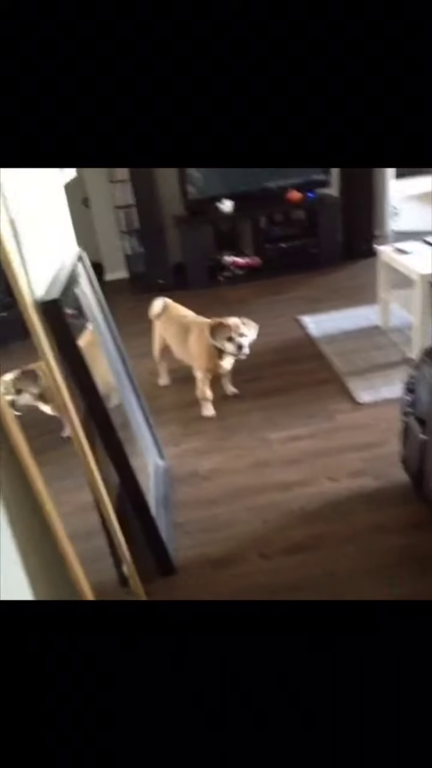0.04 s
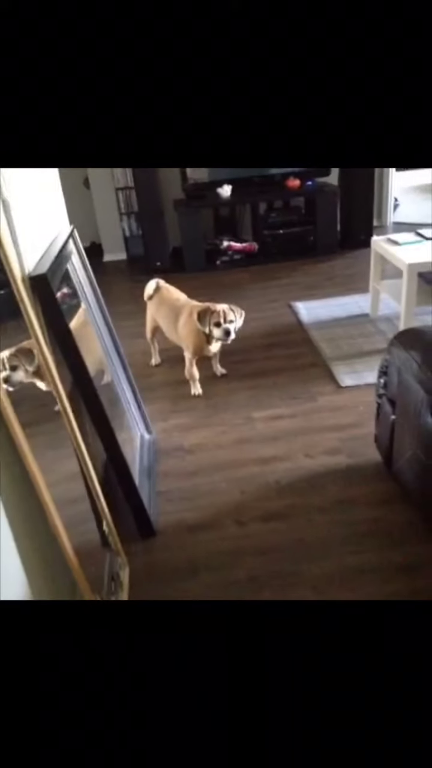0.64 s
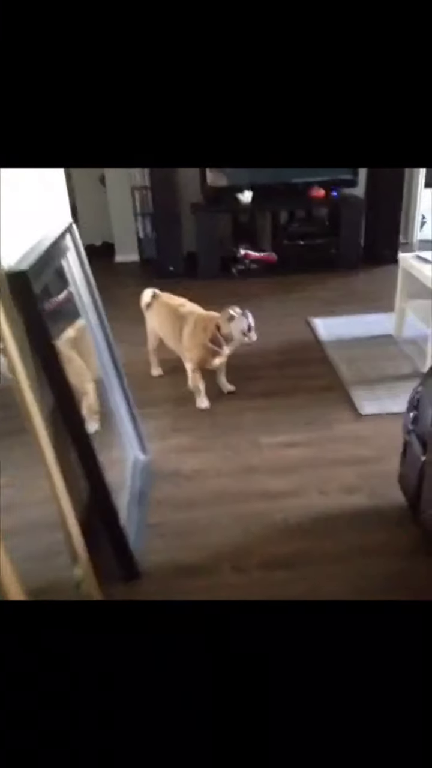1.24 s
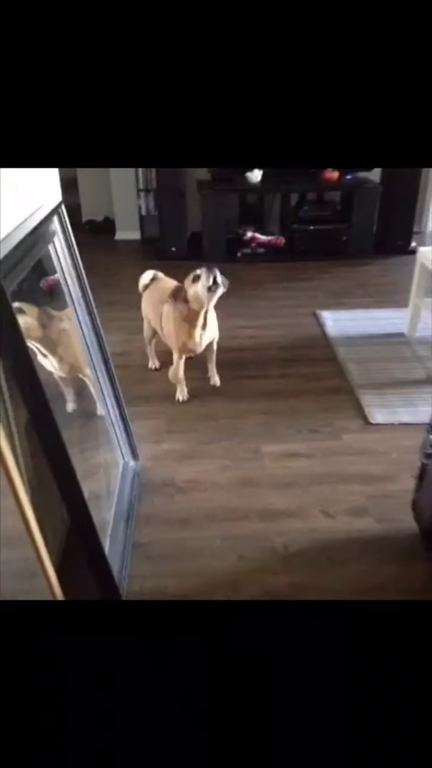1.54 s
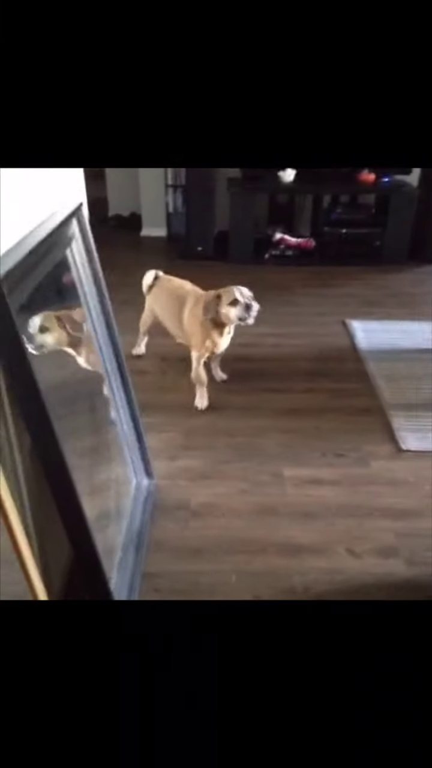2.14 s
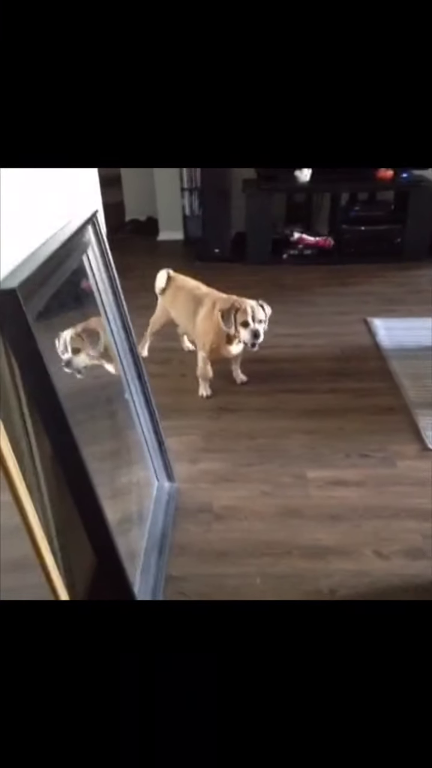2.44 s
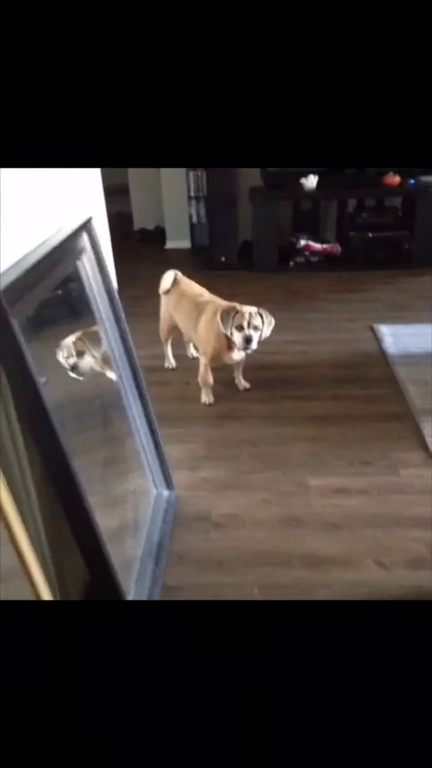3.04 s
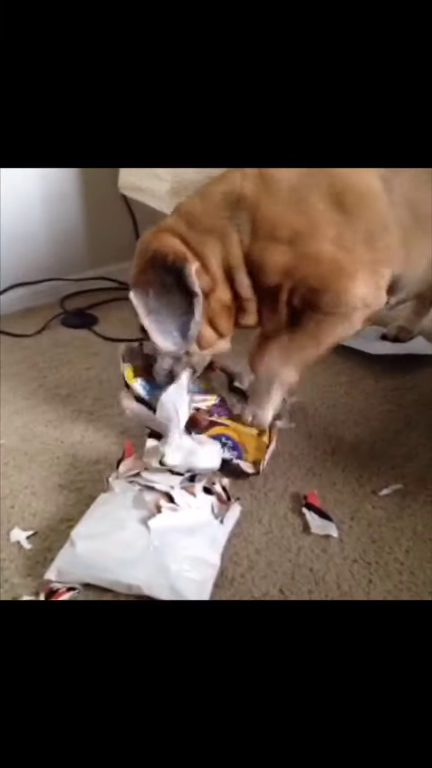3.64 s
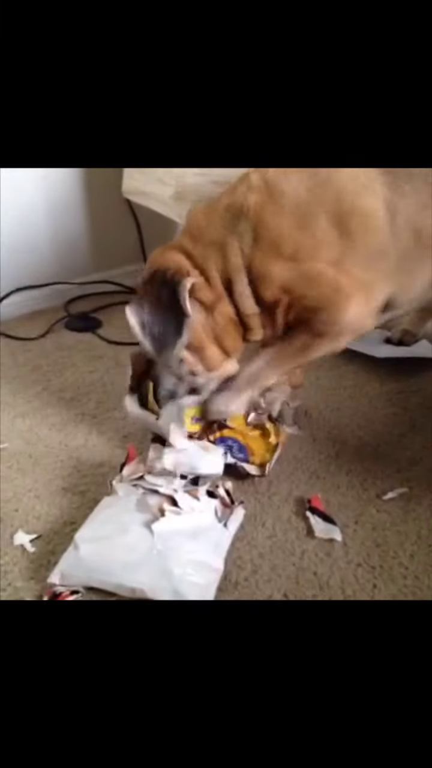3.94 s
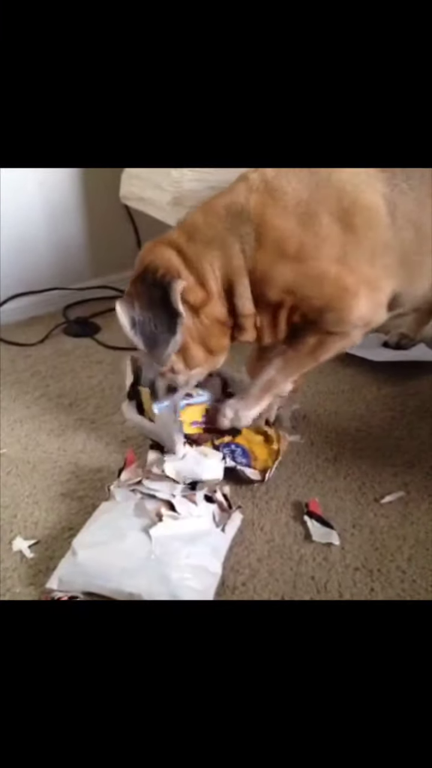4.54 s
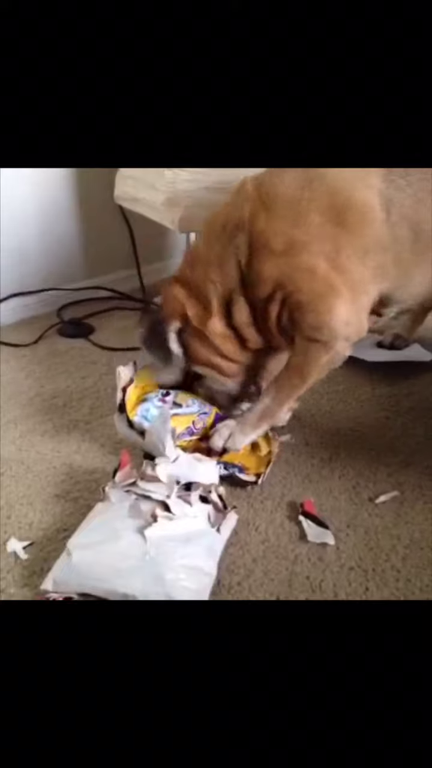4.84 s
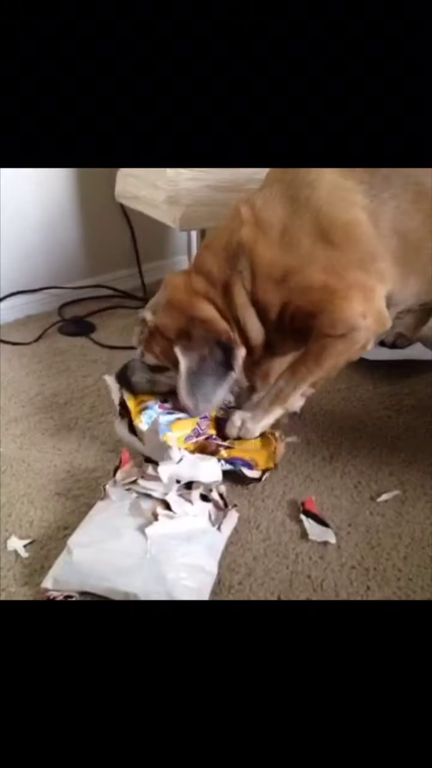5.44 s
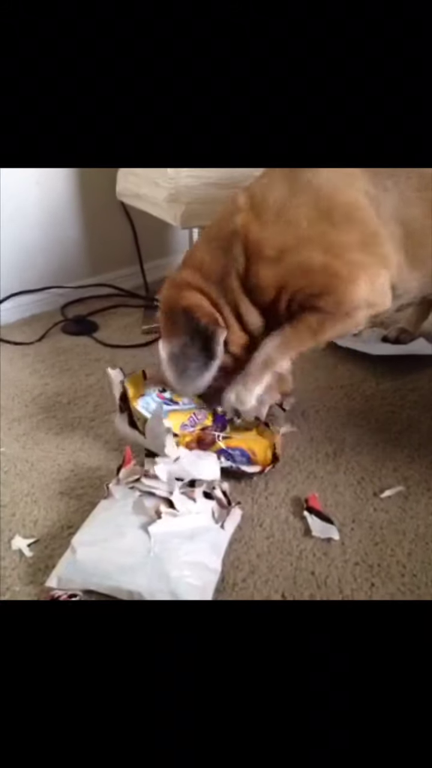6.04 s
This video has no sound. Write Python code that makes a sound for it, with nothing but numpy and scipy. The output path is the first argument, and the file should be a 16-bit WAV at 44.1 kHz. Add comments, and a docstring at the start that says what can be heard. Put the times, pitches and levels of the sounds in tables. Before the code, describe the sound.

Soft paw knocks and claw clicks sound on a hard floor over faint house noise. A small dog howls once, starting hoarse and sliding down in pitch, ringing in the bare room, then groans and draws a whistling breath. Halfway through, the place changes abruptly to a deadened room, with the microphone close to a dog working through paper wrapping: sharp snaps, short rips, hollow crunches and continuous crinkling.

```python
"""A small dog howls once in a bare, hard-floored living room. Two vocal fold vibrations make a rough
start, then one clean falling note overloads the microphone and sags into a groan and a wheezy gasp.
Paws knock and claws click on the boards, over faint house noise.
Then, close to the microphone in a carpeted room, a big dog tears and crumples a paper wrapping:
creases snap, panels buckle, fibres part and the whole sheet flexes."""
import sys
import numpy as np
from scipy import signal
from scipy.fft import rfft, irfft, next_fast_len
from scipy.io import wavfile
from scipy.ndimage import map_coordinates

SR = 44100
rng = np.random.default_rng(int(sys.argv[2]) if len(sys.argv) > 2 else 0)


def waveform_to_disk(signal):
    """Save audio, clipped to [-1, 1], as 16-bit WAV at the path in sys.argv[1]."""
    frames = np.transpose(np.atleast_2d(signal))
    scaled = np.clip(frames, -1, 1) * 32767
    samples = np.round(scaled).astype(np.int16)
    wavfile.write(sys.argv[1], SR, samples)


N = 277558
TIME = np.arange(N) / SR

# The level of the howl's fundamental, rising and dipping quickly. Each row: time in seconds, relative level of
# the fundamental in dB.
FUNDAMENTAL_LEVEL = [(1.15, -14), (1.214, -9), (1.26, -17), (1.294, -10), (1.32, -23.5), (1.352, -12),
                     (1.378, -28), (1.408, -8), (1.532, -16), (1.562, -9.5), (1.596, -12), (1.628, -16),
                     (1.71, -5), (1.77, -5.5), (1.834, -23.5), (1.922, -9.5), (1.942, -14.5), (1.972, -11.5),
                     (2.038, -24.5), (2.05, -25)]
# Unsteadiness of the folds. Each row: time in seconds, roughness from 0 to 1.
ROUGHNESS = [(1.14, .7), (1.2, .4), (1.36, .38), (1.45, .16), (1.52, .1), (1.78, .1), (1.94, .3),
             (2.07, .6)]
# Overtones from the third up. Each row: frequency in Hz, level against the fundamental in dB.
OVERTONES = [(1400, -22.5), (1700, -31.5), (2200, -42.5), (3500, -53.5), (4500, -60)]
# The voice's buzzy edge, mouth open, then lips rounded. Each row: frequency in Hz, relative gain in dB.
EDGE_OPEN = [(2500, -20.5), (3400, -16), (4100, -4), (5000, 6.5), (5800, -5.5), (6700, 2.5), (7600, -7.5),
             (9500, -14), (13000, -9.5), (16000, -23.5)]
EDGE_ROUNDED = [(2200, -1), (3200, -3.5), (4400, 0), (5500, -6.5), (7300, -2.5), (8100, -1.5), (9000, -2),
                (10800, -12.5), (13500, -12), (16000, -18.5)]
# Hoarse grating of the folds as the call starts. Each row: time in seconds, level in dB.
GRATE_LEVEL = [(1.132, -44), (1.15, -17.5), (1.185, -10), (1.23, -32.5), (1.35, -34), (1.5, -48)]
# Colour of that grating. Each row: frequency in Hz, relative gain in dB.
GRATE_SPECTRUM = [(110, -25.5), (220, -2.5), (420, -6.5), (800, 9), (1250, -20.5), (2050, -6), (2700, -31),
                  (4000, -28), (6000, -41)]
# The groan as the mouth closes. Each row: time in seconds, pitch in Hz, level in dB.
GROAN = [(2.03, 425, -30), (2.06, 368, -21), (2.095, 279, -40.5), (2.14, 216, -45.5)]
# The in-breath. Each row: time in seconds, whistle pitch in Hz, relative whistle and rush levels in dB.
IN_BREATH = [(2.16, 562, -66, -42.5), (2.25, 608, -29.5, -54), (2.3, 652.5, -37.5, -39),
             (2.38, 796, -38.5, -48), (2.46, 842, -44, -67), (2.51, 823, -72.5, -44),
             (2.55, 845, -58, -62.5)]
# Colour of the rushing breath. Each row: frequency in Hz, relative gain in dB.
BREATH_SPECTRUM = [(650, -42.5), (1100, -7), (1680, -4), (2250, -9), (2670, -5), (3120, -7.5), (5160, -5.5),
                   (8080, -11), (16000, -33)]
# Boards under the paws. Each row: start in seconds, relative level in dB, resonance and width in Hz,
# time to die by 60 dB in seconds.
BOARD_KNOCKS = [(.13, -45, 850, 400, .1), (.215, -44, 650, 500, .1), (.258, -29.5, 860, 280, .1),
                (.295, -39, 380, 350, .12), (.695, -47, 450, 500, .06), (.712, -38, 240, 300, .16),
                (.885, -55, 2700, 100, .14), (2.25, -45, 200, 200, .25), (2.31, -40, 270, 200, .15),
                (2.39, -42, 130, 130, .2)]
# Claws on the floor. Each row: start in seconds, relative level in dB.
CLAW_TICKS = [(.865, -53), (1.0, -48.5), (1.07, -48), (2.6215, -28.5)]
# Colour of a tick. Each row: frequency in Hz, relative gain in dB.
CLAW_SPECTRUM = [(410, -38), (700, -21.5), (910, 0.5), (1090, -5), (1800, -4), (2000, -5), (2130, -5.5),
                 (7290, 0), (16000, -21.5)]
# Creases snapping. Each row: start in seconds, relative levels of crack, push and fizz in dB.
CREASE_SNAPS = [(3.242, -30.5, -60, -56), (3.309, -16.5, -50, -40.5), (3.422, -13.5, -26.5, -31.5),
                (3.458, -19, -32, -30.5), (3.467, -10.5, -26, -36.5), (3.528, -7.5, -26.5, -34),
                (3.576, -6.5, -21.5, -22.5), (3.768, -16.5, -41, -39.5), (3.82, -13.5, -29.5, -39),
                (3.851, -9.5, -29, -32), (3.902, -3, -23.5, -25), (3.948, -11, -30.5, -31),
                (3.962, -8, -32.5, -29), (4.118, -6.5, -20.5, -32), (4.137, -8.5, -31, -29.5),
                (4.387, -11, -27, -34.5), (4.425, -11, -50, -33.5), (4.492, -15, -28.5, -30.5),
                (4.527, -11.5, -33, -25.5), (4.548, -16, -46, -31), (4.733, -8, -33.5, -31.5),
                (4.788, -16.5, -45, -39), (4.829, -20.5, -36.5, -48), (4.99, -13.5, -38, -32),
                (5.01, -17, -36, -28.5), (5.047, -20, -43, -29.5), (5.192, -15.5, -46, -36.5),
                (5.258, -6, -19.5, -31.5), (5.274, -6.5, -22.5, -29.5), (5.346, -15, -33, -46.5),
                (5.402, -25, -41, -36), (5.458, -20.5, -43, -37), (5.502, -15, -31.5, -35.5),
                (5.541, -18, -36.5, -27.5), (5.577, -14, -42, -29), (5.686, -23, -40.5, -39.5),
                (5.702, -22.5, -39, -43), (5.758, -17, -42, -33.5), (5.818, -19, -42, -32),
                (5.838, -11.5, -40, -28), (5.914, -15, -34.5, -38), (5.983, -19, -37.5, -44),
                (6.115, -14, -41, -41.5), (6.247, -18, -43, -30.5)]
# Stiff panels giving way. Each row: start in seconds, relative level in dB, resonance in Hz.
PANEL_BUCKLES = [(3.77, -25, 853), (4.12, -14.5, 867), (4.136, -11, 848), (4.736, -18.5, 860),
                 (4.851, -21, 840), (5.011, -19, 523), (5.03, -23, 590), (5.113, -25.5, 835),
                 (5.146, -20, 850), (5.157, -14, 842), (5.596, -25, 980), (5.685, -29, 785),
                 (5.723, -20, 835), (5.934, -23, 848)]
# Tears in the sheet. Each row: start and length in seconds, relative level in dB.
TEARS = [(3.475, 0.095, -34), (3.581, 0.03, -24.5), (3.954, 0.022, -34), (4.115, 0.042, -27),
         (4.729, .044, -42.5), (5.148, 0.026, -34), (5.24, .074, -27.5), (5.834, .013, -31.5)]
# Muzzle and paws on the paper. Each row: start and length in seconds, crinkle level in dB,
# relative level of the flexing sheet in dB.
PAPER_STROKES = [(3.137, 0.025, -57, -1.5), (3.254, 0.12, -44, -1.5), (3.41, 0.2, -31.5, -1),
                 (3.686, 0.033, -35.5, 0.5), (3.82, 0.2, -37, -2), (4.091, 0.065, -34.5, 0.5),
                 (4.227, 0.034, -44, 5), (4.354, 0.11, -36, -1.5), (4.492, 0.31, -38.5, -4),
                 (4.977, 0.078, -38, -3.5), (5.136, 0.13, -31.5, -1.5), (5.332, .055, -41, -0.5),
                 (5.506, 0.14, -42.5, 0.5), (5.7, 0.052, -39.5, 1), (5.835, 0.017, -42.5, 1.5),
                 (5.906, 0.079, -41, 2.5), (6.097, .04, -40, -3.5), (6.185, .09, -41, -5)]
# Colours of crisp paper and of the hollow sheet. Each row: frequency in Hz, relative gain in dB.
PAPER_SPECTRUM = [(350, -24), (700, -6), (1100, -8.5), (1700, -3), (2600, -5), (3800, -6), (5100, -4.5),
                  (6200, -9.5), (7600, -7.5), (10500, -18.5), (14000, -17.5), (16000, -22.5)]
SHEET_SPECTRUM = [(40, -30), (90, -26), (150, -3), (220, 0.5), (380, -0.5), (550, 3), (850, 1.5), (1300, 2),
                  (2000, -26), (3000, -49)]
# Living room tone. Each row: time in seconds, rumble level in dB, hiss level in dB.
ROOM_TONE = [(0, -52, -57), (.55, -58, -62.5), (.95, -60.5, -65), (1.1, -53, -58), (2.7, -60.5, -56),
             (2.95, -55, -64.5), (3.12, -63.5, -69.5)]
# Colours of that rumble and hiss. Each row: frequency in Hz, relative gain in dB.
RUMBLE_SPECTRUM = [(29, -62), (50, -35), (108, -6), (243, -2.5), (272, -11.5), (405, 0), (676, -8),
                   (837, -3), (1100, -18), (1300, -4.5), (1500, -28.5), (1950, -29.5), (3300, -120)]
HISS_SPECTRUM = [(880, -32), (1500, 4.5), (2080, 1.5), (2640, -1.5), (3840, -1.5), (4160, -1.5),
                 (5830, -6.5), (7240, -5.5), (16000, -22.5)]
# Decay of the two rooms. Each row: frequency in Hz, time to die by 60 dB in seconds.
BARE_ROOM = [(150, 0.2), (600, 0.85), (2000, 0.79), (6000, .6), (14000, 0.077)]
CARPETED_ROOM = [(150, 0.34), (1000, 0.19), (5000, 0.27), (14000, 0.25)]


def howl():
    """Two fold vibrations beat at first; the lower one wins, glides down and sags to a groan."""
    pitch = howl_pitch()
    level_db, = curves(FUNDAMENTAL_LEVEL)
    rough, = curves(ROUGHNESS)
    voiced = during(1.144, 3, .0084) * during(0, 2.06, .043)
    flutter = amp(2.5 * wobble(45.05) * during(1.81, 3, .041))  # the breath runs short
    octave_db = mouth_octave_db(pitch, level_db)
    note, phase = voice(pitch, octave_db - level_db, rough, jitter=.07, shimmer_db=2.5)
    note = amp(level_db - 1.18) * note * flutter * voiced
    return note + buzzy_edge(phase, rough, voiced) + squeal(pitch, level_db, rough) + groan(rough) + grate()


def howl_pitch():
    """A wavering arch in Hz; after a low start the first strain leaps above it and relaxes."""
    start_hz, crest_hz, leap_s = 513, 553, 1.17
    arch = np.maximum(crest_hz - 495 * (TIME - 1.575) ** 2, crest_hz / 2)
    strain = 135 * np.exp(-((TIME - leap_s) / .15) ** 2)
    pitch = start_hz + (arch + strain - start_hz) * during(leap_s, 3, .015)
    return pitch * (1 + .007 * wobble(28))


def voice(pitch, octave_db, rough, jitter, shimmer_db):
    """Vocal fold harmonics and their phase; roughness shakes pitch and size from cycle to cycle."""
    hz = pitch * (1 + jitter * rough * wobble(220))
    phase = 2 * np.pi * np.cumsum(hz) / SR
    tone = np.sin(phase) + amp(octave_db) * np.sin(2 * phase)
    for k in range(3, 9):
        tone += amp(along(OVERTONES, k * pitch)) * np.sin(k * phase + rng.uniform(0, 2 * np.pi))
    return np.sqrt(2) * tone * amp(shimmer_db * rough * wobble(260)), phase


def mouth_octave_db(pitch, level_db):
    """The mouth rings near the octave, more once the lips round; the octave partly follows the fundamental's
    level."""
    mouth_hz, width_hz = 1100, 190
    rounded = during(1.545, 3, .042)
    off_tune_db = 10 * np.log10(1 + (2 * (2 * pitch - mouth_hz) / width_hz) ** 2)
    return -16 + 3.5 * rounded - off_tune_db + .45 * level_db + 2 * wobble(22)


def buzzy_edge(phase, rough, voiced):
    """Each closing of the folds gives a thin whistle and a puff of air, coloured by the rounding mouth."""
    whistle = unit(sum(np.sin(k * phase + rng.uniform(0, 2 * np.pi)) * amp(3 * wobble(10))
                       for k in range(10, 27)))
    puffs = unit(rng.standard_normal(N) * (1 + .5 * np.sin(phase)))
    air_share = np.clip(.1 + rough, 0, 1)
    source = np.sqrt(1 - air_share) * whistle + np.sqrt(air_share) * puffs
    rounding = np.pi / 2 * during(1.36, 3, .15)
    buzz = np.cos(rounding) * coloured(source, EDGE_OPEN)
    buzz += np.sin(rounding) * coloured(source, EDGE_ROUNDED)
    since_push = TIME - 1.168
    burst_db = 13.5 * np.exp(-(since_push / .018) ** 2)
    buzz *= amp(-43.5 + burst_db - 3.5 * since_push) * voiced
    # The muzzle points up, so much of the treble reaches the microphone off the ceiling and walls.
    return buzz + amp(-3) * room(buzz, BARE_ROOM, delay_s=.006)


def squeal(pitch, level_db, rough):
    """A second fold vibration, a fixed interval above the note, swells with it and lingers faintly."""
    octave_db = -23 - level_db - 8 * during(1.36, 3, .06)
    tone, _ = voice(1.22 * pitch, octave_db, rough, jitter=.1, shimmer_db=3)
    presence = during(1.163, 1.44, .011) + amp(-20) * during(1.2, 1.9, .05)
    return amp(level_db - 1.5) * tone * presence


def groan(rough):
    """The voice sags, low and unsteady, as the mouth closes."""
    pitch, level_db = curves(GROAN)
    tone, _ = voice(pitch, octave_db=-9, rough=rough, jitter=.16, shimmer_db=5)
    return amp(level_db) * tone * during(2.035, 2.14, .06)


def grate():
    """The folds grate hoarsely as the call starts."""
    level_db, = curves(GRATE_LEVEL)
    return amp(level_db) * noise(GRATE_SPECTRUM) * during(1.137, 1.5, .01)


def gasp():
    """The dog draws air through a narrow throat: a rush with a rising, fuzzy whistle."""
    hz, whistle_db, rush_db = curves(IN_BREATH)
    phase = 2 * np.pi * np.cumsum(hz * (1 + .061 * wobble(290))) / SR
    whistle = amp(whistle_db) * np.sin(phase) * wobble(83) * during(2.25, 2.51, .027)
    rush = amp(rush_db + 2) * noise(BREATH_SPECTRUM) * during(2.147, 2.61, .041)
    return whistle + rush


def paws():
    """Soft pads thump the boards and claws tick on them."""
    thumps, ticks = np.zeros((2, N))
    t = np.arange(SR // 3) / SR
    for start, db, hz, width, t60 in BOARD_KNOCKS:
        board = unit(resonate(rng.standard_normal(len(t)), hz, width))
        add(thumps, start, amp(db - 60 * t / t60) * (1 - np.exp(-t / .003)) * board)
    for start, db in CLAW_TICKS:
        add(ticks, start, amp(db - 7 - 60 * t / .25) * rng.standard_normal(len(t)))
    return filtered(thumps, 'band', [75, 3200], order=3) + coloured(ticks, CLAW_SPECTRUM)


def snaps():
    """A crease snaps: a dry crack tinted by one facet, a high fizz and a push from the sheet around it."""
    cracks, fizzes, pushes = np.zeros((3, N))
    t = np.arange(SR // 15) / SR
    rise = 1 - np.exp(-t / .00072)
    envelope = rise * (amp(-60 * t / .013) + amp(-16 - 60 * t / .15))
    for start, db, push_db, fizz_db in CREASE_SNAPS:
        burst, fizz, push, lead = rng.standard_normal((4, len(t)))
        facet_hz = 3000 * np.exp(rng.normal())
        crack = unit(burst + 2 * resonate(burst, facet_hz, facet_hz / 2))
        add(cracks, start - .0032, amp(db - 24.5) * envelope * lead)  # the crease starts to give
        add(cracks, start, amp(db - 6) * envelope * crack)
        add(fizzes, start, amp(fizz_db + 15 - 60 * t / .008) * rise * fizz)
        add(pushes, start, amp(push_db + 5 - 60 * t / .047) * rise * push)
    crisp = coloured(cracks, PAPER_SPECTRUM) + filtered(fizzes, 'high', 8000)
    return crisp + coloured(pushes, SHEET_SPECTRUM)


def buckles():
    """A stiff panel gives way: a short crunch in its own hollow resonance."""
    crunches = np.zeros(N)
    t = np.arange(SR // 10) / SR
    rise = 1 - np.exp(-t / .00057)
    for start, db, hz in PANEL_BUCKLES:
        ring = resonate(rng.standard_normal(len(t)), hz, width_hz=200)
        panel = unit(resonate(ring, hz, width_hz=hz))
        add(crunches, start, amp(db - 5 - 60 * t / .045) * rise * panel)
    return crunches


def rips():
    """Fibres part in a dense run while the tear travels, and the taut sheet rumbles with them."""
    pull = sum(amp(db) * during(start, start + length, .003) for start, length, db in TEARS)
    fibres = pull * crackle(per_s=1800, spread_db=3.5, life_s=.0006)
    return coloured(fibres, PAPER_SPECTRUM) + amp(-3) * coloured(fibres, SHEET_SPECTRUM)


def crinkle():
    """Muzzle and paws work the wrapping: facets of many sizes buckle and the whole sheet flexes."""
    attack_s, settle_db_per_s = .024, 212
    crush = bend = amp(-52.5 + 2.8 * wobble(14))  # faint crinkle between strokes
    for start, length, db, flex_db in PAPER_STROKES:
        attack = np.clip((TIME - start) / attack_s, 0, 1)
        force = attack * amp(db - settle_db_per_s * np.clip(TIME - start - length, 0, 1))
        crush = np.maximum(crush, force)
        bend = np.maximum(bend, amp(flex_db) * force)
    # Facets and panels take turns to bend, so the paper's hollow tone keeps changing.
    facets, panels = np.zeros((2, N))
    for hz in np.geomspace(900, 9000, num=8):
        facet = resonate(crackle(per_s=130, spread_db=4, life_s=.001), hz, hz / 3.5)
        facets += unit(facet) * amp(3 * wobble(16))
    fine = crackle(per_s=500, spread_db=4.5, life_s=.001) + .17 * facets
    for hz in np.geomspace(170, 1200, num=5):
        panel = resonate(crackle(per_s=200, spread_db=3, life_s=.002), hz, hz / 1.5)
        panels += unit(panel) * np.sqrt(hz) * amp(2.5 * wobble(18))
    flex = amp(-1.5) * bend * unit(coloured(panels, SHEET_SPECTRUM))
    return crush * unit(coloured(fine, PAPER_SPECTRUM)) + flex


def crackle(per_s, spread_db, life_s):
    """Tiny buckles at random moments and of very unequal size; rms 1."""
    sizes = amp(spread_db * np.minimum(rng.exponential(size=N), 3))
    sizes *= rng.random(N) < per_s / SR
    energy = signal.lfilter([1], [1, -np.exp(-2 / (life_s * SR))], sizes ** 2)
    return unit(np.sqrt(energy) * rng.standard_normal(N))


def room(x, decay, delay_s):
    """The room's answer at the microphone: a diffuse tail, each frequency dying at its own speed."""
    hz, t, spectrum = signal.stft(rng.standard_normal(SR), SR, nperseg=256)
    _, tail = signal.istft(spectrum * amp(-60 * t / along(decay, hz)[:, None]), SR, nperseg=256)
    response = np.pad(tail / np.linalg.norm(tail), (round(delay_s * SR), 0))
    return signal.fftconvolve(x, response)[:N]


def room_tone():
    """Faint rumble and hiss of the house, drifting in level."""
    rumble_db, hiss_db = curves(ROOM_TONE)
    return amp(rumble_db) * noise(RUMBLE_SPECTRUM) + amp(hiss_db) * noise(HISS_SPECTRUM)


def amp(db):
    """Decibels to gain."""
    return 10 ** (np.asarray(db) / 20)


def unit(x):
    """Scale to rms 1."""
    return x / np.sqrt(np.mean(x ** 2) + 1e-20)


def along(points, hz):
    """Read (Hz, value) points on a log frequency axis."""
    freqs, values = np.transpose(points)
    return np.interp(np.log(hz + 1), np.log(freqs + 1), values)


def curves(rows):
    """One value per sample for each column after the time."""
    times, *columns = np.transpose(rows)
    return [np.interp(TIME, times, column) for column in columns]


def during(start, end, fade):
    """1 between two times, with soft edges; all in seconds."""
    return np.clip(np.minimum(TIME - start, end - TIME) / fade + .5, 0, 1)


def wobble(rate):
    """A smooth random curve, rate knots a second."""
    return map_coordinates(rng.standard_normal(int(N * rate / SR) + 4), [TIME * rate])


def coloured(x, spectrum):
    """Causal filter of unit power gain with the given (Hz, dB) shape."""
    size = 8192
    gain = unit(amp(along(spectrum, np.fft.rfftfreq(size, 1 / SR))))
    cepstrum = irfft(np.log(np.maximum(gain, 1e-6)))
    cepstrum[1:size // 2] *= 2  # fold to minimum phase
    cepstrum[size // 2 + 1:] = 0
    return signal.fftconvolve(x, irfft(np.exp(rfft(cepstrum))))[:len(x)]


def noise(spectrum):
    """Coloured noise of rms 1."""
    return unit(coloured(rng.standard_normal(N), spectrum))


def resonate(x, hz, width_hz):
    """One damped resonance."""
    hz = min(hz, SR / 2.5)
    return signal.lfilter(*signal.iirpeak(hz, hz / min(width_hz, SR / 4), SR), x)


def filtered(x, kind, hz, order=2):
    """A filter with a flat pass band."""
    return signal.sosfilt(signal.butter(order, hz, kind, fs=SR, output='sos'), x)


def add(track, start, sound):
    """Mix a sound in at a time in seconds."""
    part = track[max(round(start * SR), 0):][:len(sound)]
    part += sound[:len(part)]


def scene():
    """One microphone: first in the ringing living room, then close to the paper in the carpeted room."""
    call = howl()
    small_sounds = gasp() + paws()
    living = call + amp(-12.5) * room(call, BARE_ROOM, delay_s=.04)
    living += amp(-2) * small_sounds + amp(-10) * room(small_sounds, BARE_ROOM, delay_s=.0044)
    living += room_tone()
    paper = snaps() + buckles() + rips() + crinkle()
    rumble = amp(-63) * noise(RUMBLE_SPECTRUM)
    carpeted = paper + amp(-8.5) * room(paper, CARPETED_ROOM, delay_s=.004) + rumble
    return (living * during(-1, 3.13, .005) + carpeted * during(3.155, 7, .0028))[None]


def record(dry):
    """The microphone thins the bass, flattens the loudest peaks and keeps nothing above its band limit."""
    ceiling, hardness, top_hz = .715, 14, 16000
    thin = filtered(dry, 'high', 75)
    clipped = thin / (1 + np.abs(thin / ceiling) ** hardness) ** (1 / hardness)
    size = next_fast_len(N + SR // 4)
    in_band = np.fft.rfftfreq(size, 1 / SR) < top_hz
    return irfft(rfft(clipped, size) * in_band, size)[:, :N]


dry = scene()
out = record(dry)
waveform_to_disk(out)
```